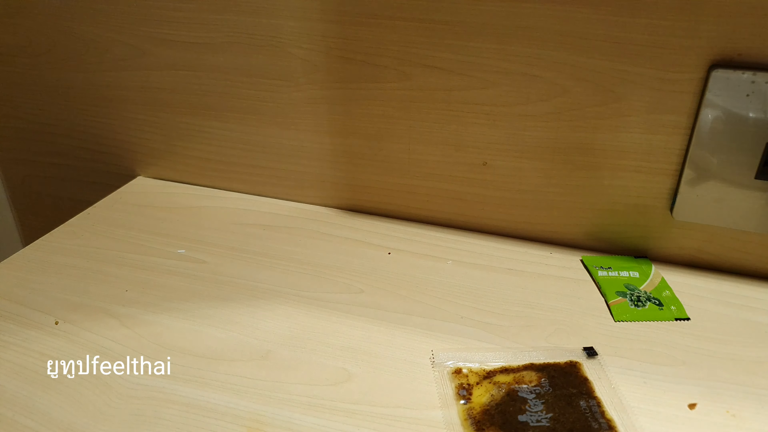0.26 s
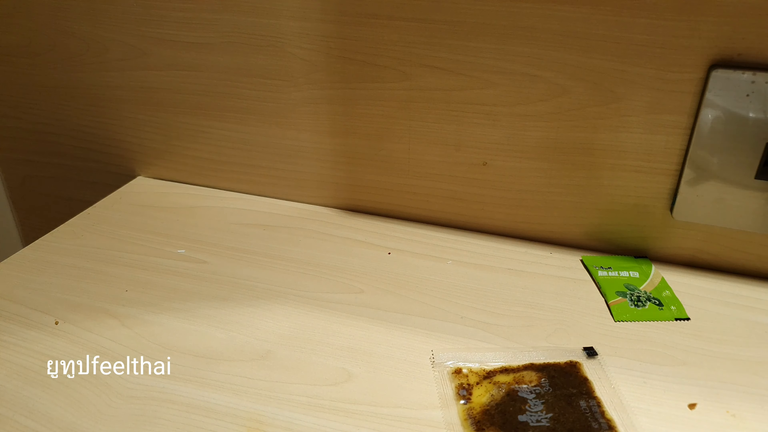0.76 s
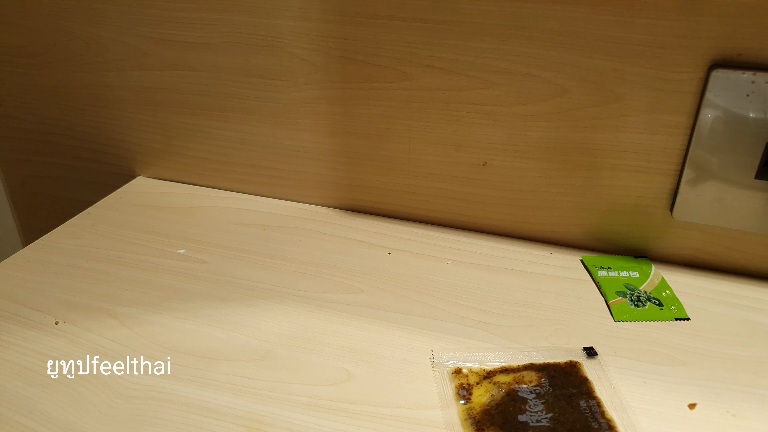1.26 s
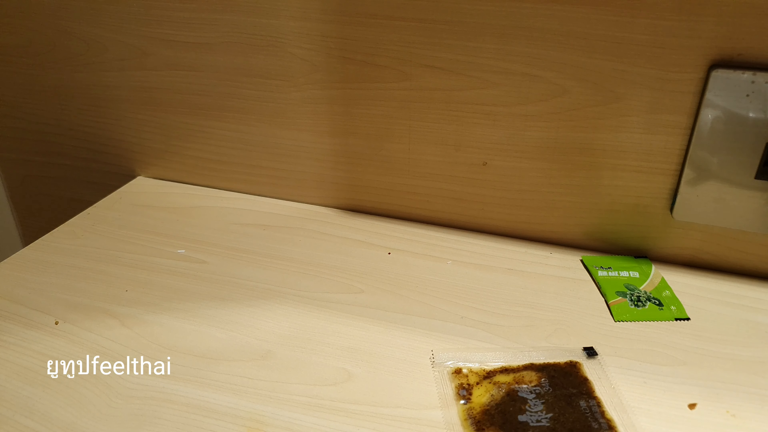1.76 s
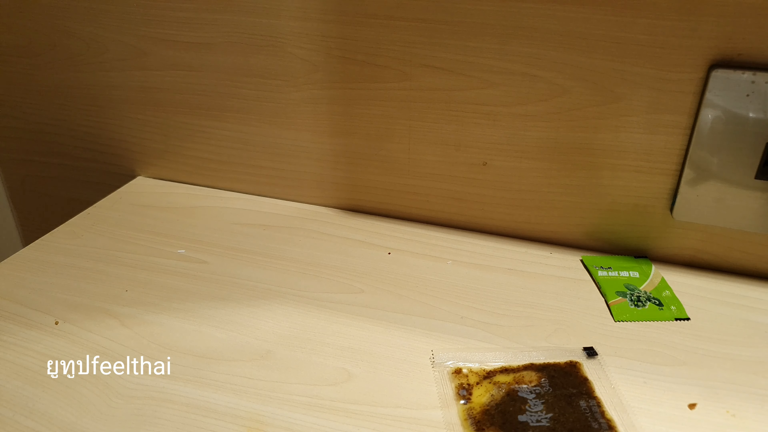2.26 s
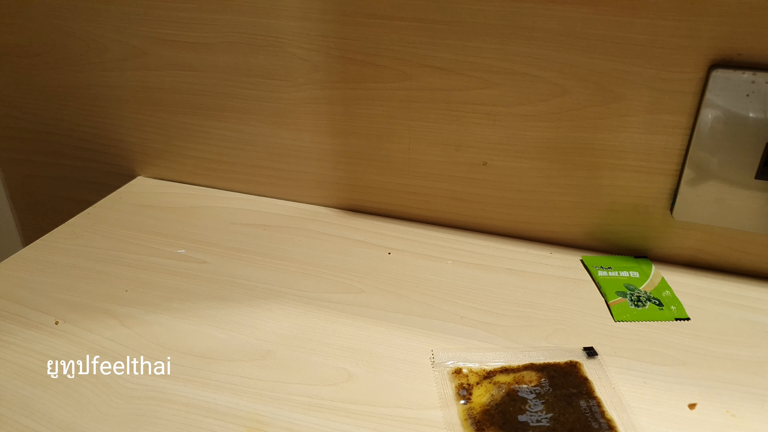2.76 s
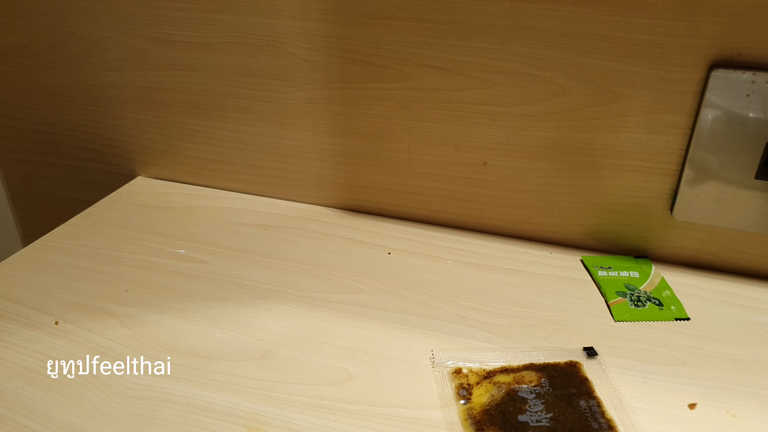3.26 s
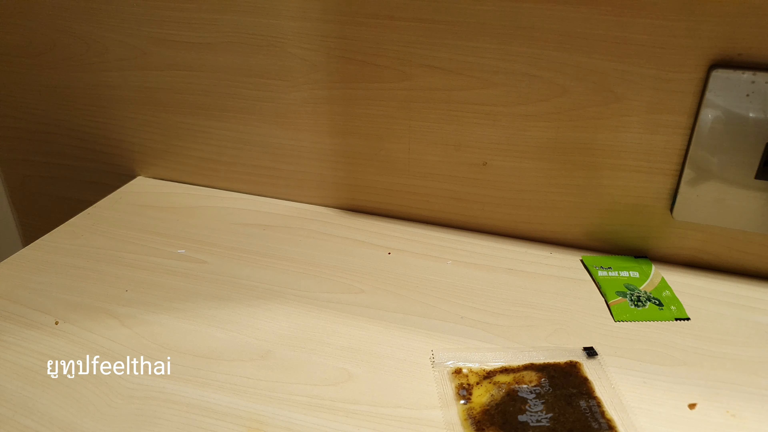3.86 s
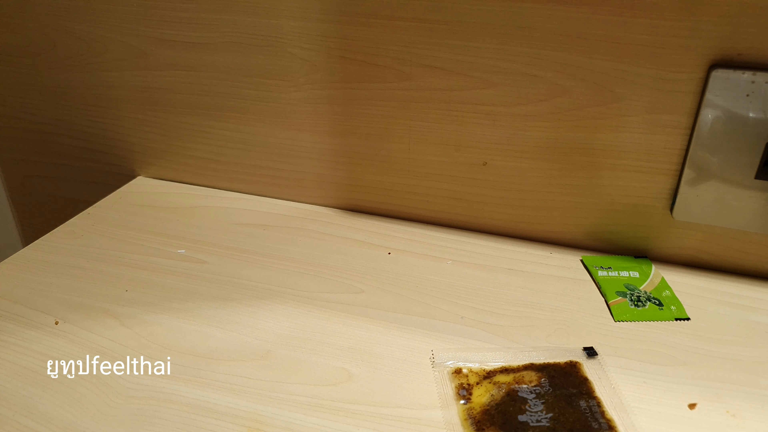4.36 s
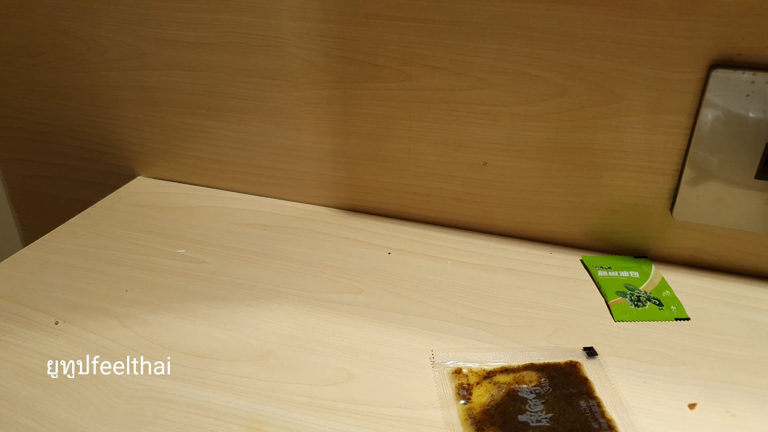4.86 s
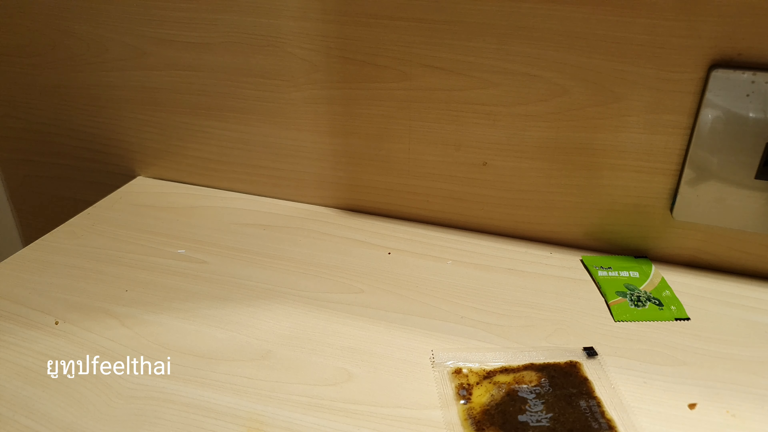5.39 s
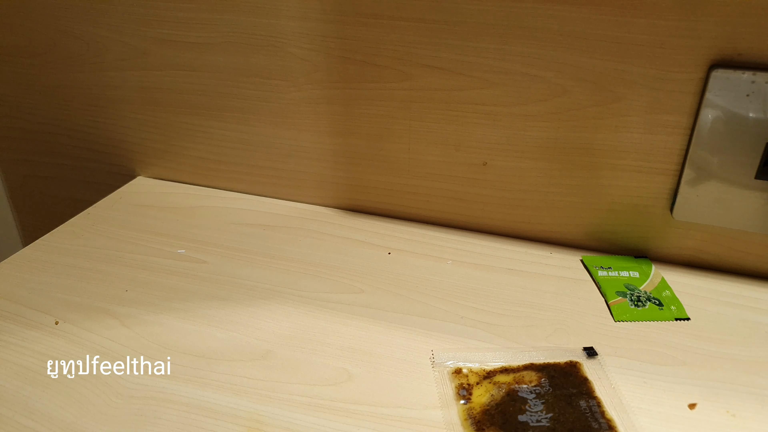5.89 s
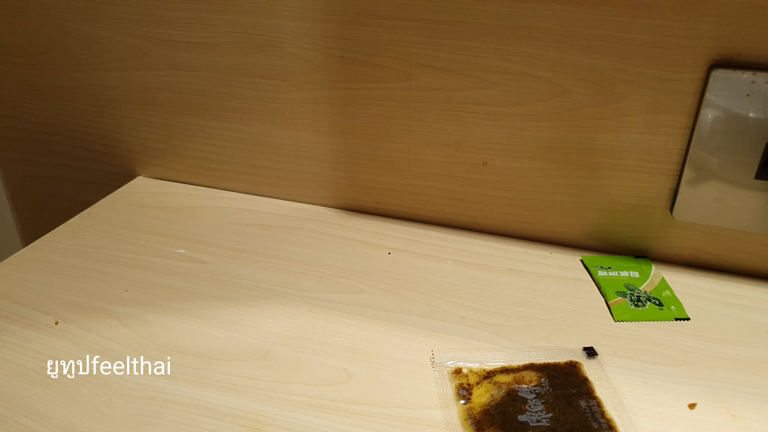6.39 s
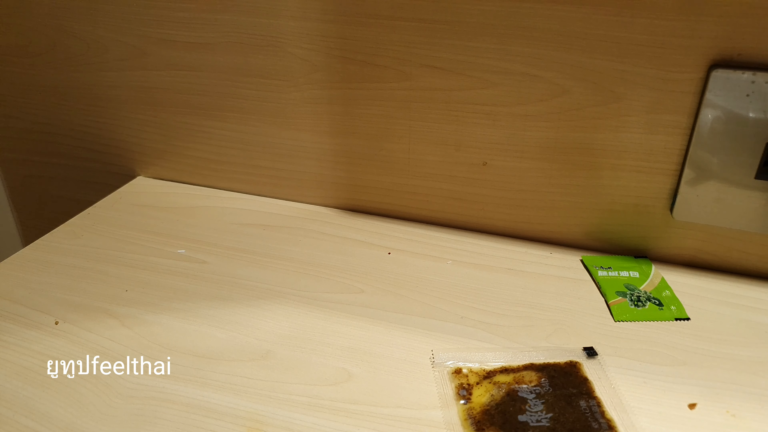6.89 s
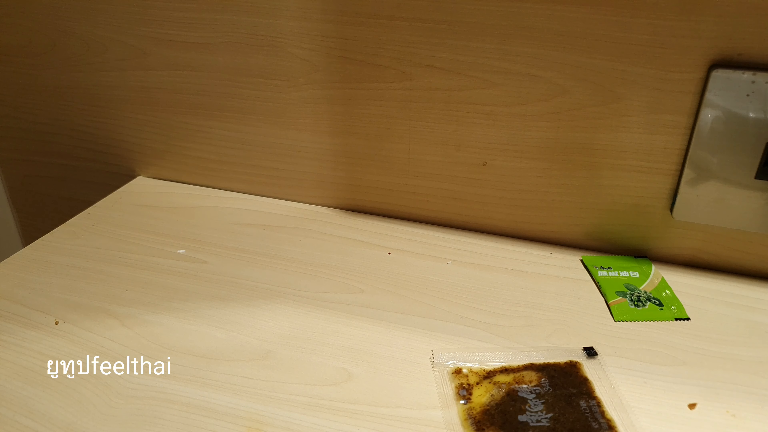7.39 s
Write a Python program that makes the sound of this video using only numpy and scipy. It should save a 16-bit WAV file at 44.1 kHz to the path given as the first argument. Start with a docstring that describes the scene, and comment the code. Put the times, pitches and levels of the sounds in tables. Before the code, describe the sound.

Hands crumple and tear plastic sachets in a quiet, humming room, knocking and rubbing against a hollow cup midway.

```python
"""An appliance hums in a quiet room as hands crumple small plastic sachets in a wooden desk nook, left of
a microphone with two openings (ports). Creases snap and the film rustles with tiny cracks. At 3 s the
hands lift toward the near port and tear and shake the sachets, louder now; until 5 s they also bump and
rub a hollow cup, which rings briefly. Softer rustling follows, the cup is bumped again near 6.4 s, and
around 7 s the hands sink back to the desk with a few last snaps."""
import sys
import numpy as np
from scipy import signal
from scipy.fft import rfft, irfft, next_fast_len
from scipy.io import wavfile
from scipy.ndimage import uniform_filter1d

SR = 44100
rng = np.random.default_rng(int(sys.argv[2]) if len(sys.argv) > 2 else 0)


def file_out(sig):
    """Save sig as 16-bit WAV at sys.argv[1]."""
    # one column per channel
    cols = np.atleast_2d(sig).T
    # limit, then scale
    lim = np.clip(cols, -1, 1)
    pcm = np.round(lim * 32767).astype(np.int16)
    wavfile.write(sys.argv[1], SR, pcm)


N = 336924
T = np.arange(N) / SR

# creases that snap: t/s, level over 2 ms/dB, favoured f/Hz, fall away from it/(dB per octave, unsigned)
CREASE_SNAPS = [(0.1813, -28.5, 2160, 3), (0.205, -35, 2070, 6.5), (0.29, -32, 3900, 5.1),
                (0.311, -32, 5140, 1), (0.3388, -29.5, 5540, 3), (0.422, -28.5, 4800, 2.5),
                (0.476, -29.5, 7280, 4), (0.7772, -36, 3900, 2), (0.834, -36.5, 5940, 9),
                (0.8466, -27, 4070, 7), (0.909, -25.5, 1450, 8.5), (0.9324, -22.5, 4480, 3.5),
                (1.109, -39, 5540, 5), (1.17, -39, 3810, 5), (1.2634, -27, 3200, 6), (1.685, -22, 5540, 1),
                (1.7332, -30, 3420, 0.5), (1.7777, -29, 1960, 5), (1.795, -24, 11030, 4),
                (1.8929, -28.5, 3770, 7), (1.921, -27, 4750, 1), (1.9345, -33, 3770, 16),
                (2.052, -29.5, 3060, 0.5), (2.1226, -34, 4830, 4), (2.178, -33.5, 1460, 6.5),
                (2.1987, -33.5, 1480, 6.7), (2.2487, -38.5, 10290, 7), (2.446, -31.5, 11820, 7),
                (2.5452, -34, 3600, 10), (2.6728, -28.5, 2320, 3), (3.0173, -29, 3700, 6.5),
                (3.0829, -21.5, 11820, 4), (3.1095, -28, 11030, 3), (3.148, -35, 8960, 8),
                (3.167, -30.5, 10400, 8.5), (3.2137, -30, 11820, 5), (3.2414, -20.5, 10290, 4.5),
                (3.272, -15.5, 5140, 2.5), (3.287, -19, 5000, 3), (3.298, -13.5, 6790, 10),
                (3.3091, -22, 6900, 10), (3.3257, -21, 11820, 5), (3.3582, -12, 13580, 2),
                (3.361, -22, 11820, 2.5), (3.3645, -14, 11820, 3), (3.3889, -12.5, 5830, 6),
                (3.4102, -15, 7280, 3.5), (3.4126, -15, 8960, 6), (3.434, -22, 5170, 8),
                (3.4442, -25.5, 4760, 14), (3.5265, -23, 4300, 9), (3.5596, -20.5, 9200, 5.5),
                (3.6049, -22.5, 3500, 7), (3.6737, -25, 2740, 1.5), (3.7346, -22, 13700, 3),
                (3.7505, -30, 2000, 9), (3.7637, -21, 5910, 1.5), (3.8369, -25, 6790, -1),
                (3.849, -19.5, 2090, 2), (3.8988, -25, 3600, -4), (3.904, -23.5, 1210, -1),
                (3.9149, -20.5, 3640, 4.5), (3.9424, -20.5, 13580, 4), (3.985, -17.5, 3500, 4),
                (4.0386, -22.5, 7240, 9), (4.0457, -24.5, 3880, 3), (4.058, -24, 4150, -3),
                (4.0654, -24, 3440, 8), (4.1788, -18, 2760, 3), (4.187, -18, 9000, 5),
                (4.192, -20, 6330, -1), (4.2072, -18, 5540, 6), (4.231, -15, 4030, 6),
                (4.2523, -17.5, 7500, 9), (4.403, -17.5, 4340, 2.5), (4.504, -28, 2930, 5.5),
                (4.5204, -20.5, 5100, 3), (4.557, -23.5, 2900, 14), (4.5674, -20.5, 3150, 4),
                (4.7597, -19.5, 5800, 4), (4.9062, -22.5, 8360, 2.5), (5.3188, -37, 5000, -2),
                (5.3877, -39, 3700, -3), (5.4239, -34.5, 4270, 1.5), (5.867, -30, 4260, 7),
                (5.873, -21.5, 3030, 7), (6.213, -37.5, 1400, 5), (6.412, -36, 5000, 2),
                (6.4357, -20, 8960, 0.6), (6.44, -23.5, 3640, 7), (6.47, -24.5, 3900, -3),
                (7.0045, -36.5, 3810, 5), (7.0145, -31, 4500, 5.5), (7.0925, -42, 900, 5),
                (7.116, -34.5, 8460, 8), (7.1494, -35.5, 1900, 5), (7.3873, -33.5, 1500, 2.5),
                (7.4043, -41, 1500, 0.5)]
# the film between grips: t/s, level/dB, extra treble/dB, crumpling share (0 slides, 1 cracks)
FILM_HANDLING = [(0, -50, 8.5, 0.77), (.6, -58.5, 3, 0.32), (1.1, -52.5, 5, 0.7), (1.55, -53.5, 4.5, 0.53),
                 (1.8, -48, 3.5, 0.87), (2.4, -67, 8, 0.67), (2.95, -65, 12, 0.72), (3.5, -47, 4, 0.54),
                 (4.1, -40, -6, 0.91), (4.35, -51.5, -1, 0.66), (4.95, -45, 3.5, 0.54),
                 (5.3, -52.5, 3, 0.7), (5.75, -49, 6.5, 0.58), (6.18, -54, 5.5, 0.6),
                 (6.38, -46.5, 4, 0.54), (6.8, -55, 8.5, 0.2), (6.92, -74, 8.5, 0.9),
                 (7.35, -63.5, 5.5, 0.43), (7.64, -57.5, -3.5, 0.36)]
# fingers grip the film: t/s, hold/s, level/dB, change over the hold/dB
FINGER_GRIPS = [(.035, 0.16, -56, 11), (.29, 0.059, -43, -2), (.42, 0.091, -49, -9),
                (.903, 0.081, -39.5, -3.5), (1.11, 0.14, -58, 3), (1.45, 0.034, -47, 1),
                (1.63, 0.11, -51, 7.5), (1.775, 0.016, -36.5, -3), (2.122, 0.1, -48.5, -11),
                (2.44, 0.12, -57.5, -4.5), (3.01, 0.36, -51, -1), (3.275, 0.17, -35.5, 1.5),
                (3.53, 0.08, -45, 12.5), (3.737, 0.066, -44.5, -2), (3.85, 0.073, -42, 8.5),
                (4.045, 0.031, -32.5, -4), (4.18, 0.04, -37.5, 10.5), (4.219, 0.0098, -35, -4),
                (4.503, 0.082, -46, 11.5), (4.6, 0.19, -39.5, 4.5), (4.81, 0.034, -35.5, 3),
                (5.45, 0.11, -47, -1), (5.872, 0.23, -40.5, -7.5), (6.41, 0.052, -38, -5),
                (6.47, 0.24, -42.5, -1), (7.005, 0.31, -49, -5), (7.39, 0.028, -51.5, -2.5)]
# tone of the rustling film: f/Hz, level/dB
FILM_TONE = [(500, -11), (900, 1), (1400, -4.5), (2200, -1), (4000, 3), (7000, -4.5), (11000, -4.5),
             (15500, -8.5)]
# the favourite pitch of each rubbing spot on the film: f/Hz
FILM_SPOTS_HZ = [1460, 2530, 3540, 6330]
# the hands lift off the desk and return: t/s, far port level/dB, papery tone from the desk/dB
HAND_LIFT = [(2.9, -1.5, 3), (3.1, -4.5, -0.5), (6.8, -4.5, -3), (7.05, 0, 5)]
# the papery tone that the desk adds: f/Hz, level/dB
DESK_TONE = [(400, -10), (1200, -6.5), (2400, -30.5)]
# bumps on the cup: t/s, peak level/dB, main f/Hz as the hand squeezes it
CUP_BUMPS = [(3.35, -24.5, 648), (3.571, -32.5, 625), (3.879, -21.5, 580), (3.97, -27.5, 623),
             (4.066, -25, 607), (4.207, -31, 530), (4.235, -19, 580), (4.402, -30, 650),
             (4.548, -26.5, 590), (6.34, -30, 533), (6.412, -32, 536), (6.441, -30, 532)]
# the cup's ringing notes: multiple of the main pitch, level/dB, time to fade by 60 dB/s
CUP_NOTES = [(1, 6, 0.068), (1.2, -1.5, 0.028)]
# a hand rubs along the cup: t/s, hold/s, level/dB, change over the hold/dB
CUP_RUBS = [(3.33, 0.045, -48, 2), (3.55, 0.684, -43, 5), (4.45, 0.57, -43.5, -8.5),
            (6.41, 0.03, -43.5, 10)]
# tone of the rubbed cup: f/Hz, level/dB
RUB_TONE = [(250, -27.5), (303, -3), (380, -22.5), (580, -6.5), (800, -17.5), (1100, -31.5)]
# tone of the room's rumble: f/Hz, level/dB
ROOM_TONE = [(15, -82), (32, -7.5), (114, 2.5), (185, -12), (317, -17.5), (503, -25.5), (911, -29),
             (1440, -35), (16000, -73)]
# the appliance's hum: f/Hz, level/dB, pitch wander/Hz
HUM_NOTES = [(49.4, -52.5, 5.98), (99.1, -46, 3.005), (199.4, -60.5, 4.18), (303, -65, 4.72),
             (842, -65, 4.14)]
# how the far port is shaded from the treble: f/Hz, level/dB
FAR_PORT_TONE = [(300, 4), (1000, -6), (4000, -6.5), (9000, -6.5), (15000, -10)]

FAR_LAG_S, TOP_HZ = .00042, 15700  # delay to the far port, where the treble is cut


def crease_snaps(click_s=.00014, fuzz_s=.001, fuzz_db=-12, ring_oct=.62, width_oct=.27):
    """A crease snaps: a sharp click with faint, brief fuzz on both sides and its own favoured pitch."""
    start, db, hz, slope_db = np.transpose(CREASE_SNAPS)[:, :, None]
    size = 512
    t = (np.arange(size) - size // 2) / SR
    shape = np.exp(-np.abs(t) / click_s) + undb(fuzz_db) * np.exp(-np.abs(t) / fuzz_s)
    burst = (rng.standard_normal((len(start), size)) + 2 * (t == 0)) * shape
    f = np.maximum(np.arange(size // 2 + 1) * SR / size, 50)
    octaves_away = np.abs(np.log2(f / hz))
    ring = ring_oct * np.exp(-(octaves_away / width_oct) ** 2)
    bass_cut_db = 9 * np.maximum(np.log2(1100 / f), 0)
    tone_db = -np.abs(slope_db) * (octaves_away - ring) - bass_cut_db
    burst = irfft(rfft(burst) * undb(tone_db) * (f < TOP_HZ), size)
    burst = burst / np.linalg.norm(burst, axis=1, keepdims=True) * np.sqrt(.002 * SR) * undb(db)
    return np.array([place(start[:, 0] + t[0], port) for port in reach_ports(burst)])


def film_rustle(cracks_per_s=150, crack_s=.0005, scatter_db=4, flicker_db=5, spot_db=5, turns_db=5):
    """Spots on the film take turns: sliding makes hiss, crumpling makes tiny cracks of uneven size."""
    times, *columns = np.transpose(FILM_HANDLING)
    quiet_db, bright_db, crumple = (np.interp(T, times, column) for column in columns)
    gain = np.hypot(undb(quiet_db), hand_moves(FINGER_GRIPS, rise_db_per_s=1399, fall_db_per_s=320))
    shape = (len(FILM_SPOTS_HZ), N)
    kicks = rng.random(shape) < cracks_per_s / SR
    kicks = kicks * undb(scatter_db * np.minimum(rng.exponential(1, shape), 4))
    fades = signal.lfilter([1], [1, -np.exp(-1 / (crack_s * SR))], kicks)
    cracks = fades * rng.standard_normal(shape)
    hiss = rng.standard_normal(shape) * undb(flicker_db * crumple * wobble(80))
    film = colour(crumple * set_level(cracks, 0) + np.sqrt(1 - crumple ** 2) * hiss, FILM_TONE)
    spots = []
    for sound, hz in zip(film, FILM_SPOTS_HZ):
        pitched = colour(sound, [(hz / 1.4, 0), (hz, spot_db), (hz * 1.4, 0)])
        spots.append(pitched * undb(turns_db * crumple * wobble(8)))
    film = set_level(np.array(spots), 1.9) / np.sqrt(len(spots))
    treble = colour(film, [(3000, -13), (9000, 1)])
    return shifting_spots(gain * (film + (undb(bright_db) - 1) * treble))


def cup_bumps(scrape_s=.0084):
    """Soft, scraping bumps ring the hollow cup, each with its own mix of the cup's notes."""
    start, peak_db, hz = np.transpose(CUP_BUMPS)[:, :, None]
    t = np.arange(6000) / SR
    ring = 0
    for multiple, db, fade_s in CUP_NOTES:
        struck_db = db + 3.4 * rng.standard_normal(start.shape)
        ring += np.sin(2 * np.pi * multiple * hz * t) * undb(struck_db - 60 * t / fade_s)
    scrape = rng.standard_normal((len(start), 2048)) * np.exp(-t[:2048] / scrape_s)
    bumps = signal.fftconvolve(ring, scrape, axes=1)
    return place(start[:, 0], bumps / np.abs(bumps).max(axis=1, keepdims=True) * undb(peak_db))


def cup_rubs():
    """Uneven rubbing makes the cup's walls and the air inside it ring."""
    friction = colour(rng.standard_normal(N) * undb(.54 * wobble(30)), RUB_TONE)
    return set_level(friction, 0) * hand_moves(CUP_RUBS, rise_db_per_s=163, fall_db_per_s=170)


def hand_moves(moves, rise_db_per_s, fall_db_per_s):
    """Loudness of hand movements that rise, hold and die away; where they overlap, their powers add."""
    t = T[::32]
    start, hold_s, db, change_db = np.transpose(moves)[:, :, None]
    held_db = db + change_db * np.clip((t - start) / hold_s, 0, 1)
    before_db = rise_db_per_s * np.maximum(start - t, 0)
    after_db = fall_db_per_s * np.maximum(t - start - hold_s, 0)
    return np.interp(T, t, np.linalg.norm(undb(held_db - before_db - after_db), axis=0))


def shifting_spots(spots, size=24000):
    """The spots keep moving, so each short, overlapping piece of their sound gets its own echoes."""
    hop = size // 2
    padded, window = np.pad(spots, ((0, 0), (hop, size))), np.hanning(size)
    out = np.zeros((2, N + 3 * size))
    for i in range(0, N + hop, hop):
        heard = np.sum(reach_ports(padded[:, i:i + size] * window), axis=1)
        out[:, i:i + heard.shape[1]] += heard
    return out[:, hop:hop + N]


def reach_ports(sounds, far_echo_db=10):
    """Each sound (one a row) reaches both ports with echoes, later and duller at the far one."""
    count = len(sounds)
    paths = echoes(count)
    paths[1] *= undb(far_echo_db)
    paths[0, :, 0] = 1  # straight to the near port
    far_lags = int(FAR_LAG_S * SR) + rng.integers(-2, 3, count)
    paths[1, np.arange(count), far_lags] = 1
    paths[1] = colour(paths[1], FAR_PORT_TONE)
    return signal.fftconvolve(sounds[None], paths, axes=2)


def echoes(count, nook_fade_s=.016, room_fade_s=.2):
    """Sound bounces off the nook's close walls, then the room: fading noise for each spot and port."""
    t = np.arange(SR // 10) / SR
    nook = undb(-60 * t / nook_fade_s) * (t > .001)
    room = undb(-60 * t / room_fade_s) * (t > .005)
    fade = nook / np.linalg.norm(nook) * undb(-12.5) + room / np.linalg.norm(room) * undb(-21)
    return colour(rng.standard_normal((2, count, len(t))) * fade, [(2000, 6.5), (16000, 3.5)])


def room_background(air_db=-44):
    """The room rumbles alike at both ports, its faint hiss differs, and an appliance's hum wavers."""
    shared, apart = (colour(rng.standard_normal(N), ROOM_TONE) for _ in range(2))
    apart = colour(apart, [(60, -24), (130, -17.5), (300, -9.5), (700, -1)])
    near, far = shared + apart, colour(shared - apart, [(500, 0), (15000, -9)])
    air = set_level(np.array([near, far]), air_db)
    hum = 0
    for hz, db, wander_hz in HUM_NOTES:
        gain = np.sqrt(2) * undb(db + 2.6 * wobble(13))
        hum += gain * np.sin(2 * np.pi * np.cumsum(hz + wander_hz * wobble(10)) / SR)
    return air * undb(2 * wobble(3.65)) + hum


def undb(db):
    """Turn decibels into a number to multiply by."""
    return np.exp(np.asarray(db) * (np.log(10) / 20))


def set_level(x, db):
    """Scale a sound to an average (RMS) level."""
    return x * undb(db) / np.sqrt(np.mean(x ** 2))


def colour(x, table):
    """Shape a sound's tone along a curve of (f/Hz, level/dB) points."""
    size = next_fast_len(x.shape[-1])
    hz, db = np.transpose(table)
    f = np.maximum(np.arange(size // 2 + 1) * SR / size, 1)
    gain = undb(np.interp(np.log(f), np.log(hz), db))
    return irfft(rfft(x, size) * gain, size)[..., :x.shape[-1]]


def wobble(steps_per_s):
    """A smooth random drift around zero."""
    hold = int(SR / steps_per_s)
    steps = np.repeat(rng.standard_normal(N // hold + 1), hold)
    return uniform_filter1d(uniform_filter1d(steps, hold), hold)[:N]


def place(times, sounds):
    """Lay each short sound at its time."""
    out = np.zeros(N + sounds.shape[1])
    for start, sound in zip(times, sounds):
        i = int(start * SR)
        out[i:i + len(sound)] += sound
    return out[:N]


def scene():
    """Mix film, cup and room; lifting the hands thins the film's tone and dims it at the far port."""
    cup = cup_bumps() + cup_rubs()
    cup = np.array([cup, undb(-4.5) * np.roll(cup, int(FAR_LAG_S * SR))])
    near, far = crease_snaps() + film_rustle()
    times, far_db, desk_db = np.transpose(HAND_LIFT)
    film = np.array([near, far * undb(np.interp(T, times, far_db))])
    film += (undb(np.interp(T, times, desk_db)) - 1) * colour(film, DESK_TONE)
    return film + cup + room_background()


def record(dry):
    """The loudest snaps are softly limited, and the highest treble is cut."""
    limited = .85 * np.tanh(dry / .85)
    return signal.sosfilt(signal.ellip(10, .3, 70, TOP_HZ, fs=SR, output="sos"), limited)


dry = scene()
out = record(dry)
file_out(out)
```